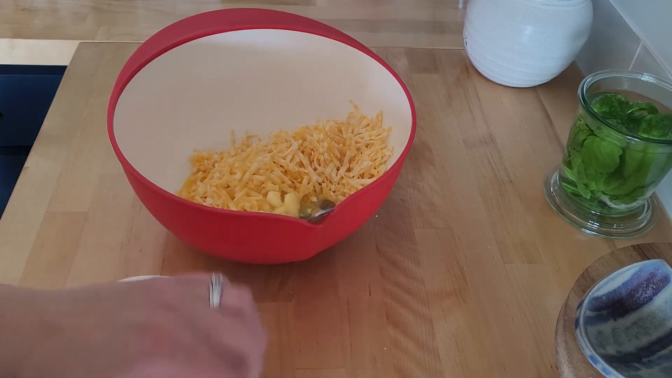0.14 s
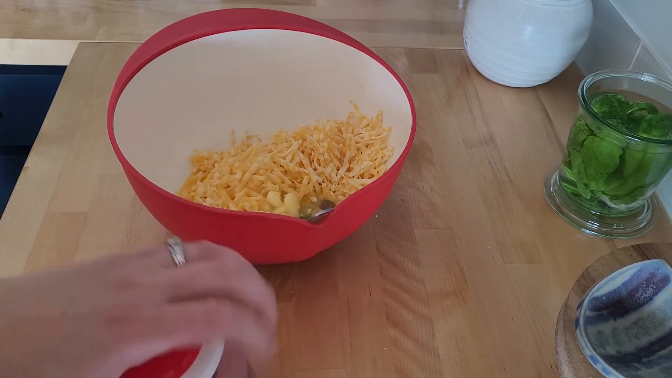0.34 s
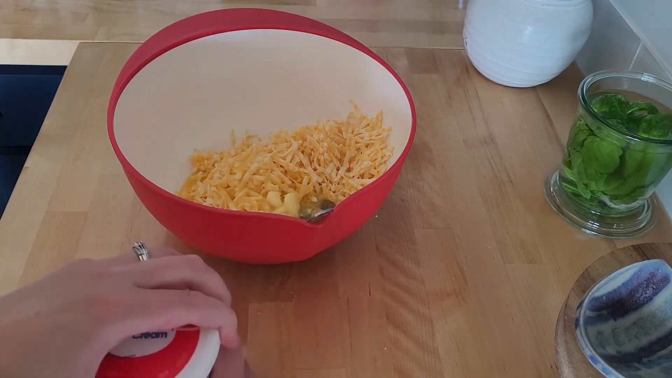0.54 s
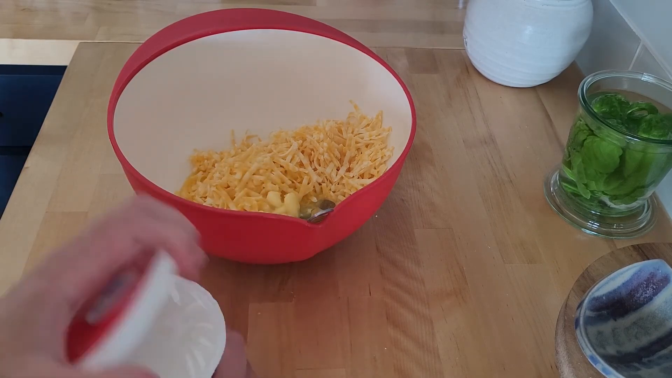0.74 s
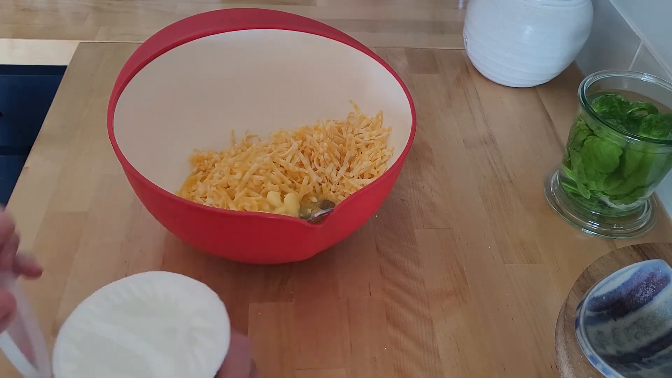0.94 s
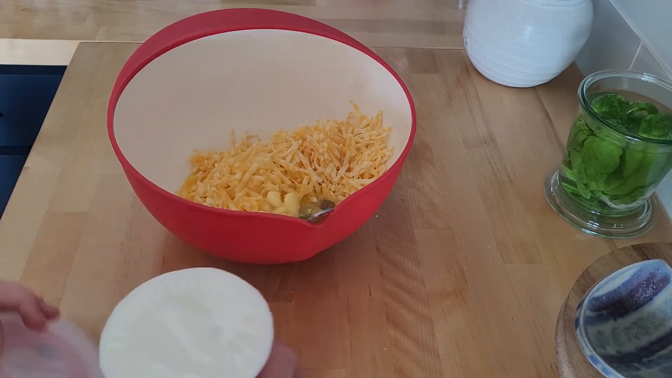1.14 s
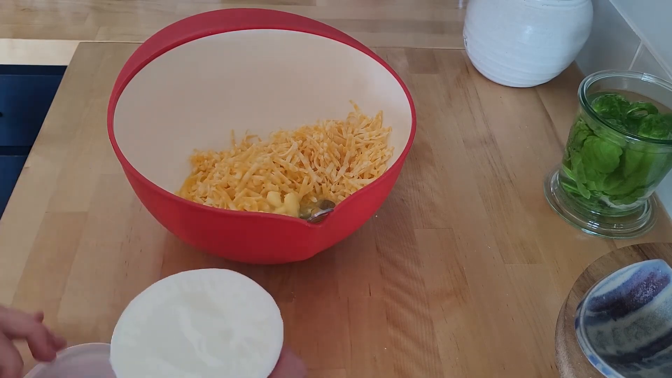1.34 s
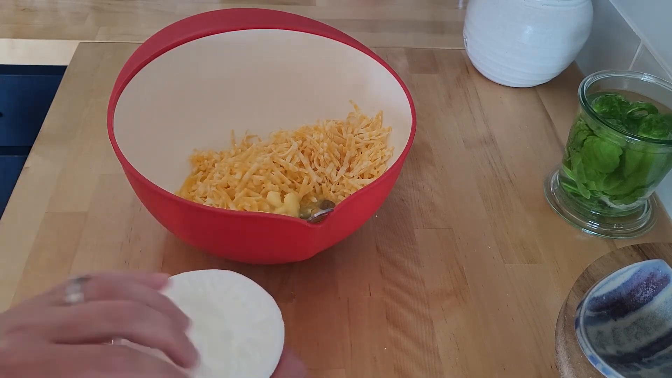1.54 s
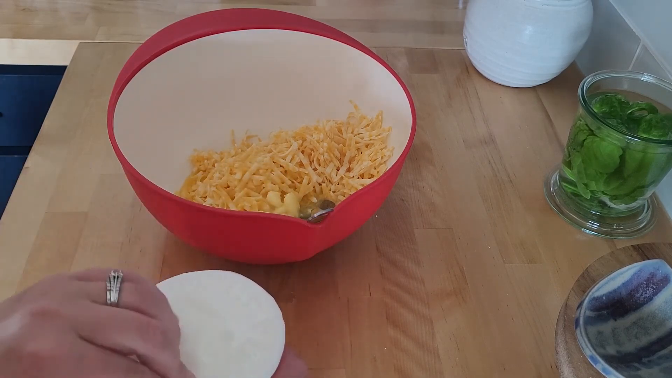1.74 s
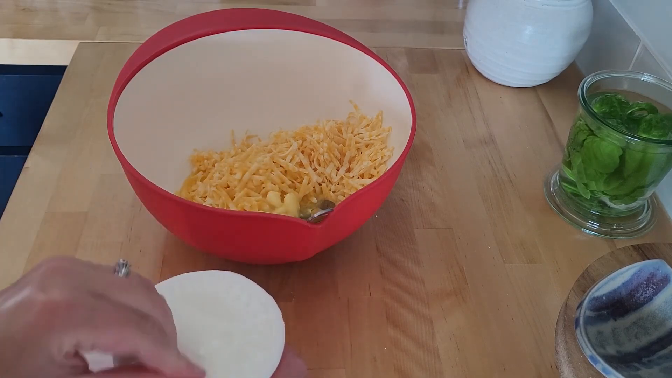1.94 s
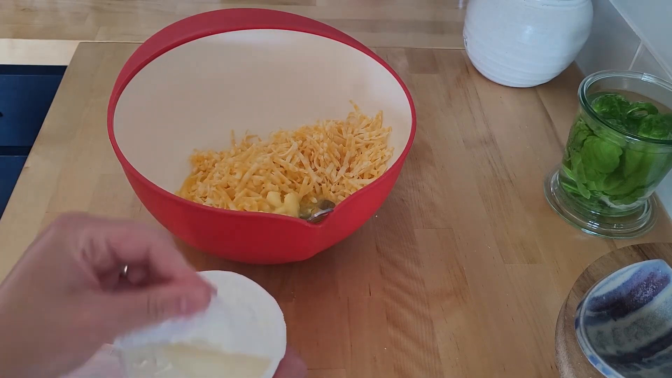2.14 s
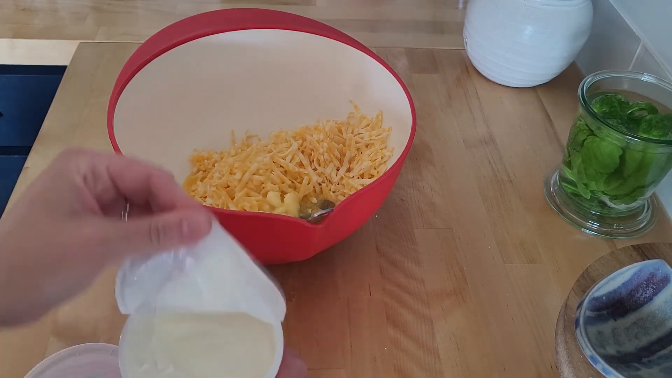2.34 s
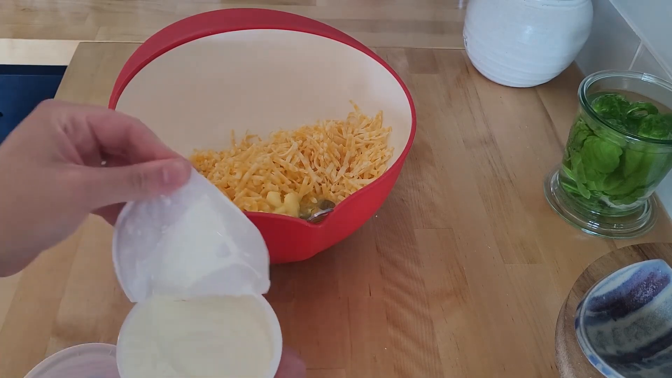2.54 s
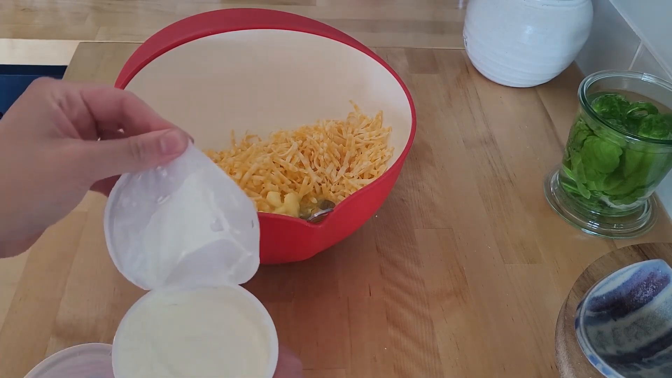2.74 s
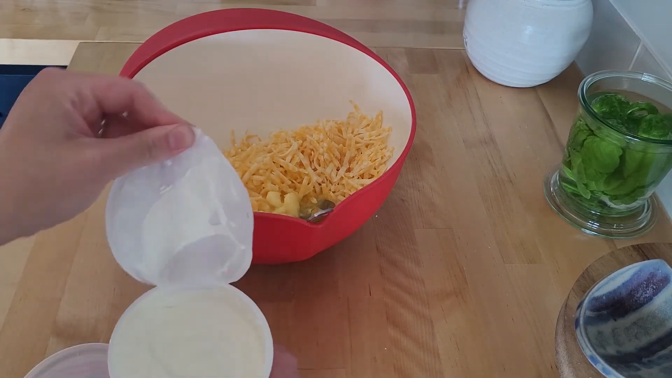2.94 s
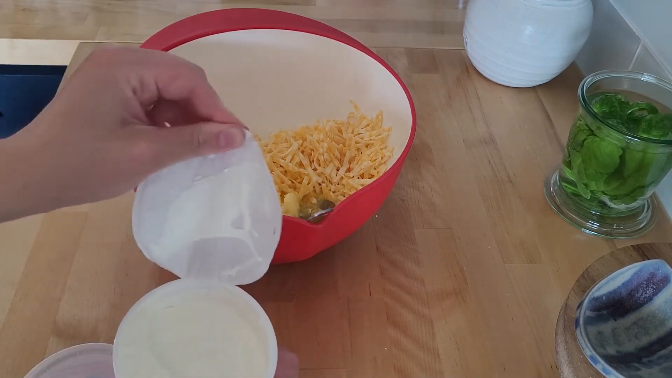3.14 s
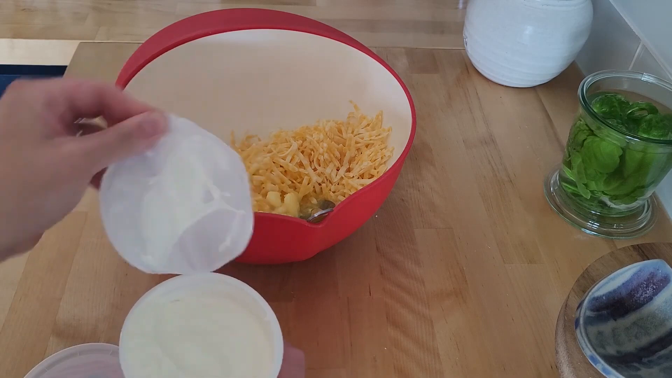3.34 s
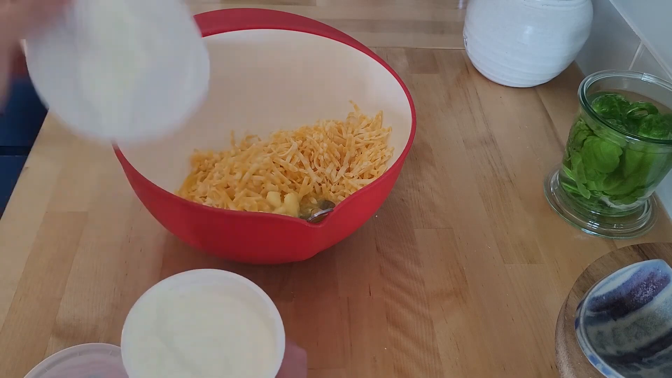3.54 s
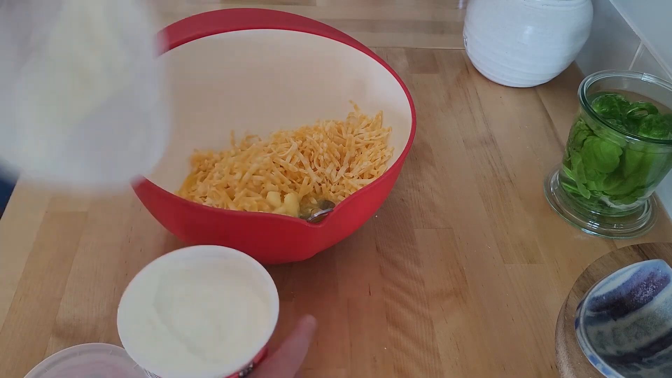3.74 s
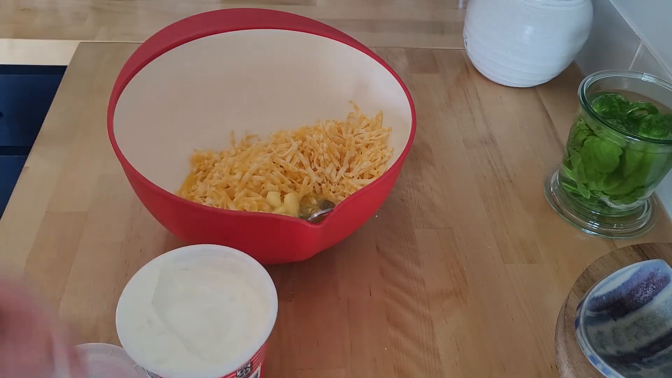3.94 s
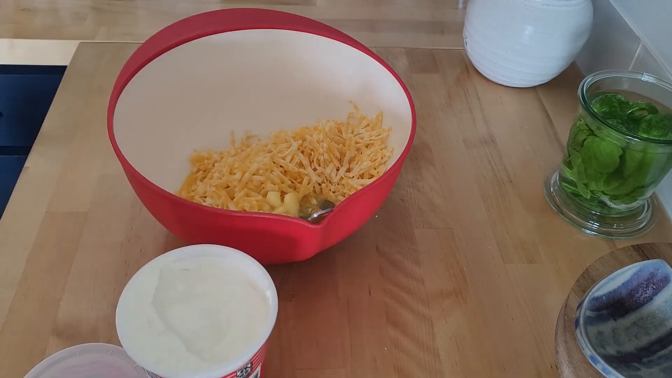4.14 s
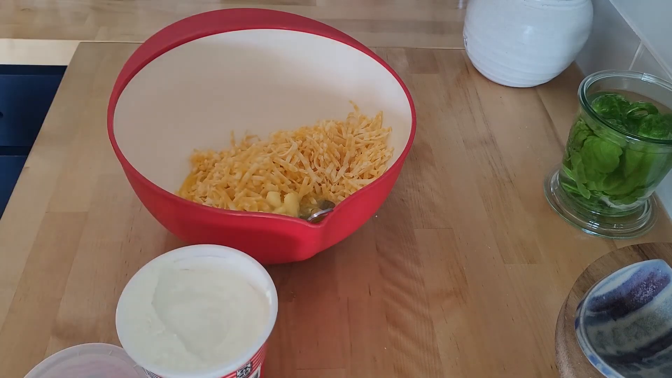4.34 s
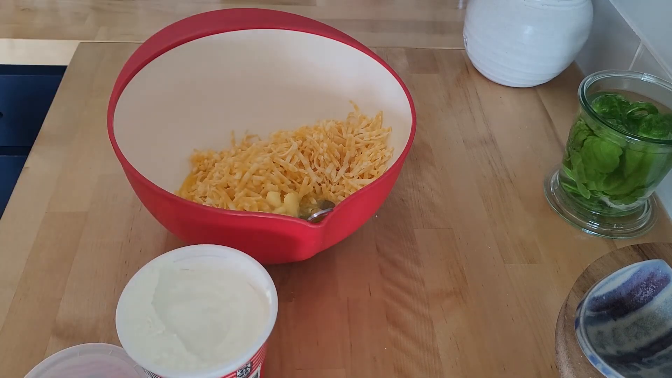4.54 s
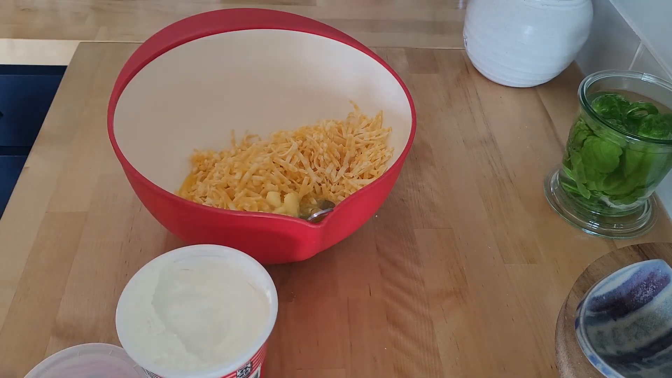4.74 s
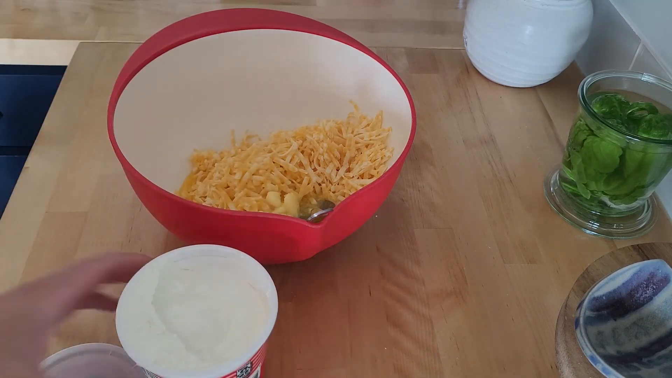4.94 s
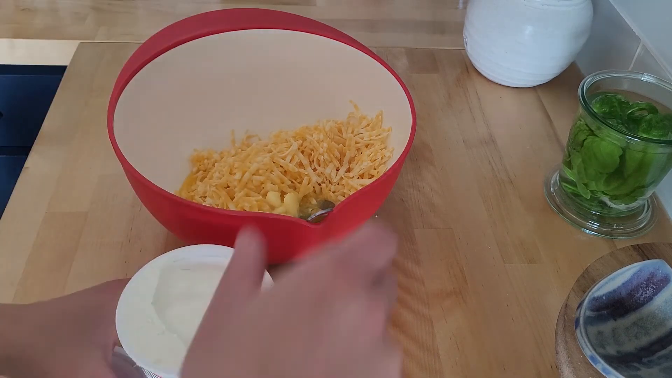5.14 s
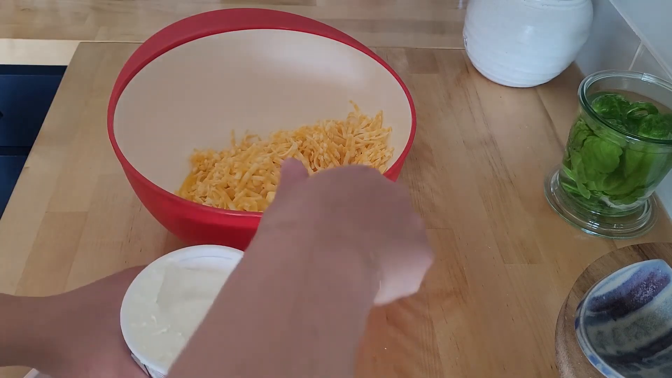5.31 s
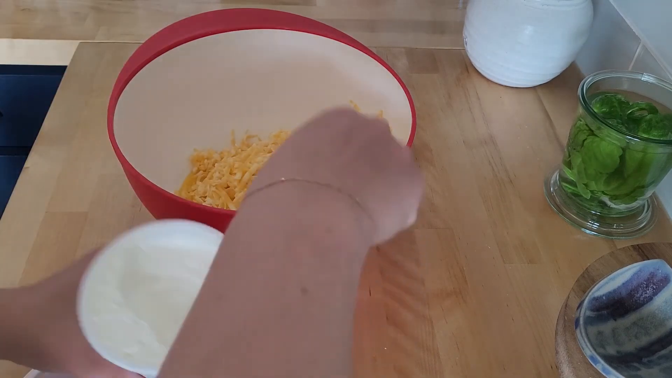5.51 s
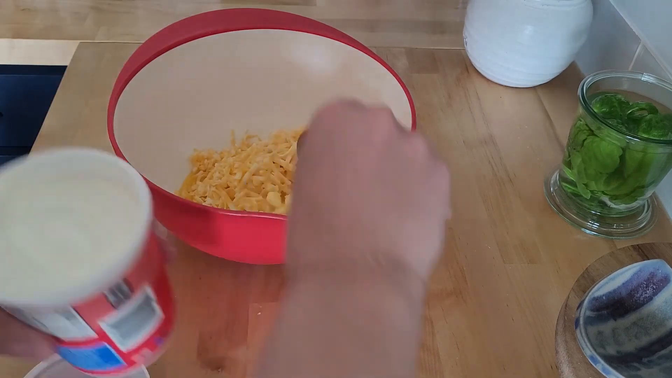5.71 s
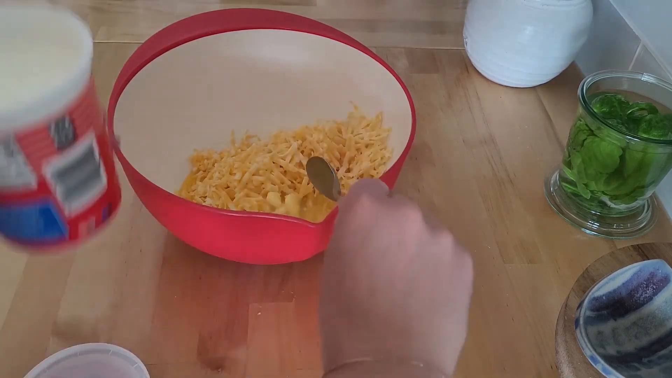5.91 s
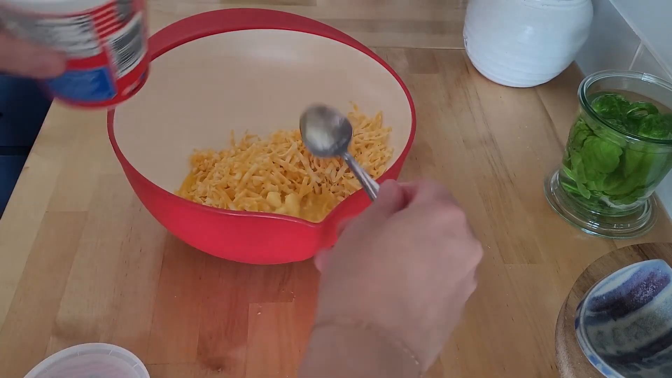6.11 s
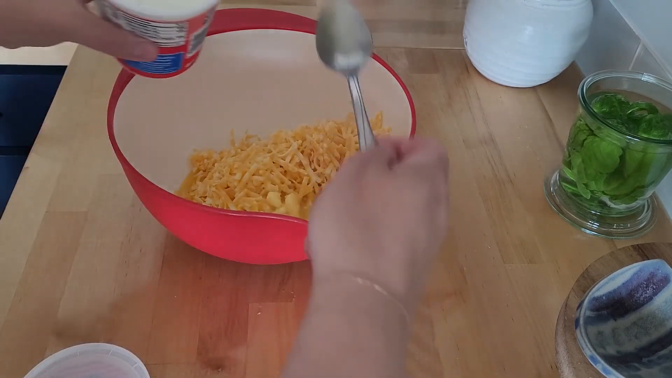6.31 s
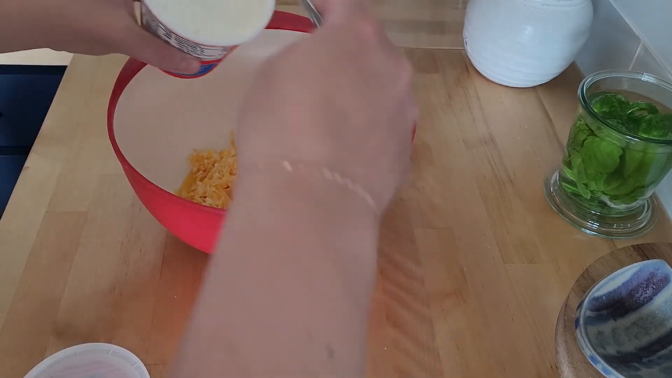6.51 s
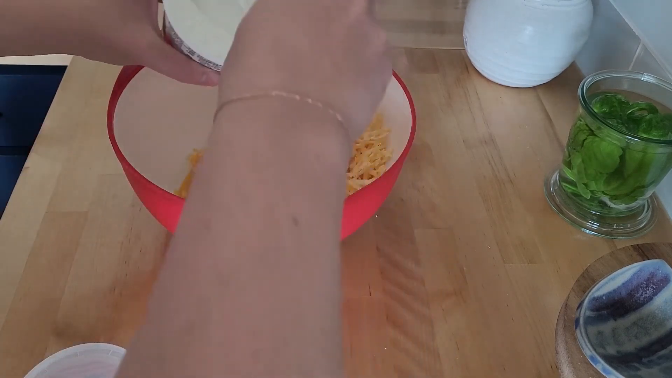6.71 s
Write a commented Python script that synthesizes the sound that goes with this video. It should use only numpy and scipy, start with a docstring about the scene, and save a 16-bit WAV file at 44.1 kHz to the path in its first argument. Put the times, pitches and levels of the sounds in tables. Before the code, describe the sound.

Sharp, close clicks come from a plastic lid being pried off a tub and dropped. Then a thin seal tears from the rim, crinkling for about two seconds. After a small metallic clink come a short rustling tap, the soft brush of a hand and a bouncing knock on a wooden counter. The kitchen adds a short reverberation and a faint, steady low hum.

```python
"""On a wooden kitchen counter, a plastic tub is opened close to a two-port microphone.
The lid snaps off and is dropped; the thin seal is peeled with crackles and put away. Both sound by
stick-slip friction: runs of tiny slips excite the resonances of the plastic. A hand brushes past,
something metallic clinks, and knocks ring the counter's modes. A small motor hums behind it all,
the room adds a short reverberation, and a faint hiss lingers at the end."""
import sys
import numpy as np
from scipy import signal
from scipy.io import wavfile

SR = 44100
rng = np.random.default_rng(int(sys.argv[2]) if len(sys.argv) > 2 else 0)


def bounce(signal):
    """Save signal as a 16-bit WAV file at the path given by the first command-line argument."""
    frames = np.transpose(np.atleast_2d(signal))
    limited = np.clip(frames, -1, 1)
    pcm = np.round(limited * 32767).astype(np.int16)
    wavfile.write(sys.argv[1], SR, pcm)


N = 298557
CRACK_ALIKE, BODY_ALIKE = 0.21, 0.54   # share of power common to both ports; the rest takes other paths
SEAL_WIDTHS = (.35, .26)   # crack and body bandwidths as shares of their pitch


def amp(db):
    """Amplitude ratio of a level in decibels."""
    return 10 ** (np.asarray(db) / 20)


def rms_one(x):
    """Normalisation to unit rms."""
    return x / np.sqrt(np.mean(x ** 2) + 1e-20)


def peak_one(x):
    """Normalisation to unit peak."""
    return x / np.max(np.abs(x))


def at_hz(points, hz):
    """Interpolation on a log-frequency axis."""
    pitches, values = np.transpose(points)
    return np.interp(np.log(hz), np.log(pitches), values)


def butterworth(x, order, hz, kind):
    """Filtering with a maximally flat passband."""
    return signal.sosfilt(signal.butter(order, hz, kind, fs=SR, output="sos"), x)


def drift(rate_hz):
    """Low-passed noise: a slow random fluctuation of unit rms."""
    r = np.exp(-2 * np.pi * rate_hz / SR)
    return rms_one(signal.lfilter([1], [1, -2 * r, r * r], rng.standard_normal(N + SR))[SR:])


def resonate(x, hz, width_hz):
    """A damped resonator with unit gain at its peak."""
    r = np.exp(-np.pi * width_hz / SR)
    poles = [1, -2 * r * np.cos(2 * np.pi * hz / SR), r * r]
    return signal.lfilter(np.array([1, 0, -1]) * (1 - r * r) / 2, poles, x)


def forced_modes(x, modes):
    """Forced response, at unit rms, of modes (pitch_hz, width_hz, level_db) of alternating sign."""
    return rms_one(sum((-1) ** k * amp(db) * resonate(x, hz, width_hz)
                       for k, (hz, width_hz, db) in enumerate(modes)))


def free_modes(modes, strength, size):
    """Free decay after a blow; strength gives each mode a level offset and a sign."""
    t = np.arange(size) / SR
    return sum(amp(db + 1.7 * offset - 60 * t / t60) * np.sign(sign) * np.sin(2 * np.pi * hz * t)
               for (hz, db, t60), offset, sign in zip(modes, *strength))


def burst(noise, decay_s, hard=0.29, lead_s=1e-5):
    """Stick-slip: a run of slips creeps in and dies away; hard weights a sharp first slip."""
    t = np.arange(noise.shape[-1]) / SR - lead_s
    late = np.maximum(t, 0)
    decay = np.exp(-late / max(decay_s, .0003)) + hard * np.exp(-late / .0003)
    return noise * np.where(t < 0, np.exp(2.6 * np.minimum(t, 0) / lead_s), decay)


def swells(peak_s, db, rise_s, hold_s, fall_db_per_s):
    """Exponential envelopes that rise 23 dB in rise_s, hold and fade; the strongest prevails."""
    late = np.arange(0, N, 16) / SR - np.c_[peak_s]
    before_db = 23 * np.maximum(-late, 0) / np.maximum(np.c_[rise_s], .001)
    after_db = fall_db_per_s * np.maximum(late - np.c_[hold_s], 0)
    return np.repeat(amp(np.max(np.c_[db] - before_db - after_db, axis=0)), 16)[:N]


def panned(x, pan_db):
    """A level difference of left over right."""
    return x * amp([[pan_db / 2], [-pan_db / 2]])


def alike_below(pair, hz):
    """Diffuse-field coherence: left and right agree in the bass and differ in the treble."""
    mid, side = pair[0], butterworth(pair[1], 1, hz, "high")
    return np.array([mid + side, mid - side])


def at_ports(noise, alike):
    """Partial coherence: both ports share the first of three noises; the right hears later and less."""
    lag = round(.00016 * SR)
    left, right = np.sqrt(alike) * noise[0] + np.sqrt(1 - alike) * noise[1:]
    return panned(np.array([left, np.pad(right, (lag, 0))[:len(right)]]), pan_db=2.0)


def ambience():
    """The kitchen's noise floor: half-octave bands that flicker by random amplitude modulation."""
    # spectrum of the quiet kitchen: pitch_hz, relative_density_db
    spectrum = [(25, -12), (50, -3.5), (100, -10), (165, -14.5), (230, -5), (320, -8), (420, -16),
                (700, -27.5), (1100, -44), (3500, -41.5), (6000, -33), (15000, -55.5)]
    edges_hz = 22 * 2 ** np.arange(0, 9.8, .5)
    white = rng.standard_normal((2, 2, N))
    flicker_db = [2 * drift(5), 2 * drift(9)]
    out = 0
    for k, (low, high) in enumerate(zip(edges_hz, edges_hz[1:])):
        band = butterworth(white[k % 2], 2, [low, high], "band")
        out = out + band * amp(at_hz(spectrum, np.sqrt(low * high)) + flicker_db[k % 2])
    return amp(-65.5) * rms_one(alike_below(out, hz=400))


def motor():
    """Periodic vibration of a small motor: one tone, wavering slightly in pitch and level."""
    pitch_hz = 132.5 + .5 * drift(2.2)
    phase = 2 * np.pi * np.cumsum(pitch_hz) / SR
    hum = np.sqrt(2) * amp(-57.5 + 2.1 * drift(10)) * np.sin(phase)
    return panned(hum, pan_db=-6.0)


def reverberation(x):
    """Diffuse reflections: convolution with octave bands of noise, each decaying at its own rate."""
    # reverberation time of the kitchen: pitch_hz, t60_s
    decay_times = [(60, 0.51), (400, 0.43), (1100, 0.45), (3000, 0.51), (8000, 0.35), (14000, 0.3)]
    t, tail = np.arange(SR) / SR, 0
    for low in 40 * 2. ** np.arange(9):
        band = butterworth(rng.standard_normal((2, SR)), 2, [low, min(2 * low, 20000)], "band")
        tail = tail + band * amp(-60 * t / at_hz(decay_times, np.sqrt(2) * low))
    tail = alike_below(tail * np.minimum(t / 0.0028, 1), hz=500)   # echoes build up
    tail /= np.sqrt(np.sum(tail ** 2) / 2)
    return amp(-12.5) * signal.fftconvolve(x[None], tail, axes=1)[:, :N]


def swish_and_hiss():
    """Incoherent noise at the ports: a hand brushes past, then faint steady background hiss at the end."""
    # hand brushing past, then background hiss in the last row: peak_s, level_db, rise_s, hold_s
    noise_swells = [(3.6, -68, 0.092, 0.017), (3.964, -63, 0.024, 0.14), (4.62, -72.5, .03, .12),
                    (5.24, -64, 0.36, 0.047), (5.56, -76, .1, .15), (6.25, -92.5, 0.21, 0.48)]
    white = rng.standard_normal((2, 2, N))
    bright = forced_modes(white[0], [(2370, 680, -21.0), (5560, 4000, 5), (14600, 1600, -5.5)])
    dull = amp(-3.5) * rms_one(resonate(white[1], 921, 3500))
    return swells(*np.transpose(noise_swells), fall_db_per_s=41) * (bright + dull)


def metal_clink():
    """Modal ringing: a scraping touch briefly excites thin metal."""
    # touches on the metal: start_s, peak_db
    touches = [(3.9568, -24.5), (4.057, -52)]
    # modes of the metal: pitch_hz, level_db, t60_s
    metal_modes = [(1754, -16.5, 0.2), (1838, -21.5, 0.13), (3560, -7, 0.11), (4500, -17, 0.08),
                   (5400, -9, .12), (6657, -9, 0.1), (6640, 8.5, 0.067), (7020, -3, 0.12),
                   (9430, -2.5, 0.094)]
    size = 8192
    out = np.zeros(N + size)
    noises = rng.standard_normal((len(touches), 1024))
    strengths = rng.standard_normal((len(touches), 2, len(metal_modes)))
    for (start_s, db), noise, strength in zip(touches, noises, strengths):
        ring = signal.fftconvolve(free_modes(metal_modes, strength, size), burst(noise, decay_s=.008))
        at = round(start_s * SR)
        out[at:at + size] += amp(db) * peak_one(ring[:size])
    return out[:N]


def counter_knocks():
    """Impact excitation: each contact rings the counter's modes unevenly and rattles briefly."""
    # knocks and their bounces: start_s, level_db, relative_crack_db, relative_tick_db
    contacts = [(5.8795, -14, -2, -9.5), (5.893, -12, -20, -26), (5.918, -15, -20.5, -30.5),
                (5.945, -19, -9, -44), (4.787, -32, -25, -41), (4.826, -41.5, -30, -41)]
    # modes of the wooden counter: pitch_hz, level_db, t60_s
    wood_modes = [(66, -3, 0.11), (92.2, -1, 0.092), (115, 1.5, 0.06), (199, -4, 0.12),
                  (229.5, -10.5, 0.25), (280, -9, 0.19), (307, 0, 0.023), (513, -12.5, 0.12),
                  (623, -2, 0.042), (846, -9, 0.076), (1104, -5.5, 0.038)]
    size = 8192
    out = np.zeros(N + size)
    noises = rng.standard_normal((len(contacts), size))
    strengths = rng.standard_normal((len(contacts), 2, len(wood_modes)))
    for (start_s, db, crack_db, tick_db), noise, strength in zip(contacts, noises, strengths):
        ring = peak_one(free_modes(wood_modes, strength, size))
        rattle = burst(noise, decay_s=0.017, hard=0.93)
        crack = peak_one(resonate(resonate(rattle, 880, 1100), 1234, 5700))
        tick = peak_one(resonate(rattle, 4900, 11400))
        at = round(start_s * SR)
        out[at:at + size] += amp(db) * (ring + amp(crack_db) * crack + amp(tick_db) * tick)
    return out[:N]


def counter_bumps():
    """Structure-borne sound: the tub and hands bump the counter, which rumbles in two bass bands."""
    # bumps on the counter: peak_s, level_db, hold_s
    bumps = [(.322, -50, 0.015), (.53, -54, 0.024), (.769, -42, 0.016), (1.138, -50, 0.037),
             (1.344, -44, 0.0038), (1.903, -56.5, 0.007), (2.174, -45, 0.09), (2.4, -46.5, 0.031),
             (2.53, -47.5, 0.092), (3.154, -49.5, 0.0067), (3.38, -50, 0.031), (3.511, -45.5, 0.017)]
    peak_s, db, hold_s = np.transpose(bumps)
    rise_s = np.full(len(bumps), 0.033)
    low = rms_one(butterworth(rng.standard_normal(N), 4, [58, 115], "band"))
    upper = rms_one(butterworth(rng.standard_normal(N), 4, [150, 430], "band"))
    return swells(peak_s, db, rise_s, hold_s, fall_db_per_s=168) * (low + amp(-5) * upper)


def plastic_crackle():
    """Stick-slip under the fingers: dense slips ring the sheet and wall modes near the bend's pitch."""
    # pulls until the plastic gives: give_s, level_db, rise_s, hold_s, bend_hz, relative_bend_db
    pulls = [(0.001, -42, 0.018, 0.03, 660, -14), (0.103, -53, .05, 0.069, 473, -9),
             (0.179, -38.5, .002, 0.045, 400, -13), (0.337, -50, 0.018, 0.024, 1560, -2.5),
             (.49, -66.5, .02, 0.039, 404, 1), (0.637, -34, 0.0011, 0.055, 440, -9.5),
             (0.77, -22, 0.077, 0.016, 500, -16.5), (0.808, -23.5, .05, 0.01, 1490, -11),
             (1.139, -48, 0.0018, .05, 600, 2), (1.22, -52, .05, .03, 1300, -3),
             (1.303, -52.5, .1, 0.052, 1680, 1.5), (1.355, -36, .002, 0.0016, 1860, -8.5),
             (1.719, -54, 0.082, 0.092, 910, -31.5), (1.909, -43, .002, 0.0055, 1490, -12),
             (2.003, -42, 0.0083, 0.032, 1270, -11.5), (2.095, -34.5, .001, 0.048, 1530, -24),
             (2.148, -31.5, .01, 0.026, 1370, -5.5), (2.179, -27, .001, 0.0088, 1440, -8.5),
             (2.396, -32, 0.18, 0.022, 1300, -7), (2.504, -25, .001, 0.0069, 1140, -9.5),
             (2.689, -33.5, 0.081, 0.0096, 1710, -6), (2.904, -46.5, 0.11, 0.0067, 1150, -9),
             (2.987, -40.5, 0.0071, 0.015, 1700, -10.5), (3.063, -31, 0.0011, 0.022, 1870, -7.5),
             (3.297, -66, .002, 0.0068, 1230, -4), (3.375, -50, 0.052, 0.011, 970, 1.5),
             (3.509, -30.5, 0.0018, 0.0018, 890, -15.5), (3.7, -68.5, .1, 0.17, 400, -6),
             (3.968, -57, 0.079, 0.13, 1250, -12), (4.191, -67, .05, 0.13, 443, -9.5)]
    # resonances of the thin sheet: pitch_hz, width_hz, level_db
    sheet_modes = [(3020, 3400, 1), (4360, 1100, 6.5), (6660, 1600, 0.5)]
    slips_per_s, spread_octaves, seal_from_s = 3500, 0.88, 2.3
    t = np.arange(N) / SR
    give_s, db, rise_s, hold_s, bend_hz, bend_db = np.transpose(pulls)
    effort = swells(give_s, db, rise_s, hold_s, fall_db_per_s=395)
    rustle = swells(give_s, db - 24.5, rise_s, hold_s, fall_db_per_s=122.5)
    pull = np.maximum(np.searchsorted(np.sort(give_s - rise_s / 2), t) - 1, 0)   # each bends its own spot
    shape = (2, 3, N)
    sizes = amp(3.5 * np.minimum(rng.exponential(1, shape), 4)) * rng.choice([-1, 1], shape)
    slips = sizes * (rng.random(shape) < slips_per_s / SR) * amp(3.5 * drift(60))
    sheet, wall = at_ports(slips[0], CRACK_ALIKE), at_ports(slips[1], BODY_ALIKE)
    bent = 0
    for hz in np.geomspace(260, 2400, 10):
        weight = np.exp(-(np.log2(hz / bend_hz[pull]) / spread_octaves) ** 2)
        bent = bent + weight * rms_one(resonate(wall, hz, 0.16 * hz))
    fizz_db = np.where(t < seal_from_s, -14, -10)   # the thin seal is brighter than the lid
    fizz = amp(fizz_db) * rms_one(resonate(sheet, 11000, 5400))
    return (effort + rustle) * (forced_modes(sheet, sheet_modes) + fizz + amp(bend_db[pull]) * bent)


def snaps(events, widths, burst_s, body_stretch, hard):
    """Transient excitation: slips drive a bright crack, a duller, longer body ring and a fizz."""
    size, lead_s = 4096, 0.0013
    crack_width, body_width = widths
    out = np.zeros((2, N + size))
    for start_s, db, crack_hz, body_hz, body_db, fizz_db in events:
        noise = rng.standard_normal((3, 3, size))
        decay_s = burst_s * 2 ** (-0.015 * (db + 14))   # louder snaps are shorter
        sharp = at_ports(burst(noise[0], decay_s, hard, lead_s), CRACK_ALIKE)
        dull = at_ports(burst(noise[1], body_stretch * decay_s, hard, lead_s), BODY_ALIKE)
        fine = at_ports(burst(noise[2], 0.91 * decay_s, hard, lead_s), CRACK_ALIKE)
        crack = peak_one(resonate(sharp, crack_hz, crack_width * crack_hz)
                         + .2 * resonate(sharp, 4000, 4000))
        ring = peak_one(resonate(dull, body_hz, body_width * body_hz) + .1 * resonate(dull, 900, 1500))
        fizz = peak_one(butterworth(fine, 2, 9000, "high"))
        at = round(start_s * SR)
        out[:, at:at + size] += amp(db) * (crack + amp(body_db) * ring + amp(fizz_db) * fizz)
    return out[:, :N]


def scrape_and_seal_landing():
    """Drawn-out friction: the bright scrape of the metal clink, then the seal rustling and landing."""
    # scrape of the clink (first two rows), then the seal put away:
    # start_s, level_db, crack_hz, body_hz, relative_body_db, relative_fizz_db
    contacts = [(3.9561, -29, 6550, 1770, -43, 1), (4.055, -40, 6500, 1760, -6, 7),
                (4.2014, -47.5, 4100, 970, -3.5, -3), (4.2788, -49, 2120, 2110, -21, -21),
                (4.362, -52.5, 3020, 1820, 2.5, -10.5), (4.3835, -48, 5150, 1770, -8.5, -13),
                (4.6185, -46, 5870, 611, -34, -24), (4.7723, -27, 5400, 2000, -1, -15),
                (4.783, -14.5, 2300, 900, -16.5, -25), (4.7995, -21, 2000, 2230, -28, -24)]
    return snaps(contacts, SEAL_WIDTHS, burst_s=0.015, body_stretch=1.86, hard=0)


def seal_peeling():
    """Stick-slip peeling: the seal tears from the rim and crumples, ringing its broad resonances."""
    # tears and creases: start_s, level_db, crack_hz, body_hz, relative_body_db, relative_fizz_db
    tears = [(1.697, -27.5, 5700, 2020, -23, -3.5), (1.731, -23.5, 4870, 2020, -14, -1),
             (1.7766, -27.5, 2780, 2130, -10.5, -12), (1.7848, -19.5, 5050, 536, -15.5, -1.5),
             (1.882, -43, 3900, 980, -4.5, -19.5), (1.9009, -18, 5450, 1440, -35, -10.5),
             (1.9314, -52, 2500, 2060, 1.5, -20), (1.9832, -31.5, 4750, 1400, 11.5, -17.5),
             (1.9933, -10, 6560, 552, -18, 0.5), (2.0253, -15.5, 6170, 1330, -11, -0.5),
             (2.0967, -17, 6200, 2040, -1.5, 11.5), (2.112, -19.5, 5920, 1880, -34.5, -13.5),
             (2.1274, -28.5, 5640, 1400, -3, -17), (2.1525, -12.5, 2580, 1350, 0.5, 6),
             (2.1779, -8, 4740, 1460, -29, 3.5), (2.201, -39, 3390, 1260, -17.5, -19),
             (2.232, -20, 3130, 1430, -5.5, -16.5), (2.3176, -27.5, 4910, 1400, -11.5, -19),
             (2.3341, -9.5, 3200, 1450, -7, -19.5), (2.358, -17.5, 2530, 1410, -11.5, -7),
             (2.371, -12.5, 2460, 2170, -16.5, -15), (2.4024, -7.5, 4960, 2170, -18.5, -27),
             (2.417, -24.5, 4140, 1470, -24.5, -25), (2.4362, -15.5, 2470, 388, -7, -15),
             (2.471, -16.5, 5570, 1500, -9, -5.5), (2.4984, -11.5, 6400, 1240, -2, 9),
             (2.5336, -12.5, 5530, 872, -4, -18.5), (2.5683, -23, 3540, 856, -28, 1),
             (2.5873, -16.5, 4550, 2030, 0, -26), (2.647, -15.5, 6340, 2000, -22, -0.5),
             (2.661, -24, 2415, 853, -2.5, -6), (2.6872, -10.5, 5470, 2010, -3.5, -0.5),
             (2.6985, -14.5, 4660, 1870, -33, -10), (2.7092, -15, 3520, 1810, -0.5, -15.5),
             (2.7172, -18, 3160, 1830, 12, -22.5), (2.798, -21.5, 3640, 1830, -1.5, -24.5),
             (2.834, -19, 4700, 708, -13, 0), (2.8889, -23, 3100, 1250, -2.5, -9),
             (2.9814, -22, 5760, 2200, -12, -27), (2.9883, -21.5, 5720, 870, -17.5, 8.5),
             (3.0007, -24, 3260, 1830, -5, -9), (3.027, -21.5, 4550, 1210, -21, 4),
             (3.0581, -10, 3270, 1840, -3, -20), (3.0784, -27, 2510, 869, -5.5, -16),
             (3.095, -27, 2590, 2060, -25, -4), (3.145, -25, 3110, 1850, -12, -20),
             (3.161, -21.5, 5100, 1820, -5, -23), (3.2924, -25, 2380, 888, -4, -41),
             (3.3312, -39, 2480, 1860, 17, -37), (3.3467, -25, 3160, 705, -1, -28),
             (3.3717, -27.5, 5530, 506, -4.5, -17), (3.4082, -26.5, 2490, 861, -14, -21),
             (3.4214, -24.5, 6110, 700, -19, -11), (3.5109, -14.5, 2200, 886, -12, 5.5),
             (3.7675, -37.5, 5180, 385, -14.5, -18), (3.8235, -30.5, 3490, 355, -22, -27)]
    return snaps(tears, SEAL_WIDTHS, burst_s=0.004, body_stretch=2.2, hard=2.0)


def lid_snapping():
    """Elastic release and impact: the lid rings as it flexes, pops off and drops."""
    # snaps of the lid: start_s, level_db, crack_hz, body_hz, relative_body_db, relative_fizz_db
    lid_snaps = [(0.1588, -38.5, 3920, 413, -9.5, -17), (0.1847, -14, 3810, 404, -6, -17),
                 (0.2414, -24.5, 6715, 533, -45.5, -15), (0.2476, -11, 6860, 480.4, -42, -1),
                 (0.3229, -31, 4010, 1840, 4.5, -21.5), (0.353, -41.5, 5470, 1890, 0.5, -7.5),
                 (0.405, -39.5, 3560, 1800, 0.5, -29), (0.4822, -42.5, 3870, 392, 3.5, -21.5),
                 (0.526, -54, 3320, 396, -5.5, -8), (0.5771, -9.5, 4570, 535.4, -37, -12.5),
                 (0.5858, -5.5, 4020, 1822, -32.5, -5), (0.6289, -8, 3906, 459, -26, -26.5),
                 (0.643, -14, 5480, 479, -24.5, -20.5), (0.6978, -15.5, 6550, 1436, -2, -15),
                 (0.7205, -21, 4300, 1390, -1.5, 4), (0.7567, -8, 4050, 444, -10, -3.5),
                 (0.7796, -12, 6210, 1430, -25.5, -18.5), (0.7972, -11.5, 4540, 1310, -20, -21.5),
                 (0.813, -11, 4550, 1318, -27, -25.5), (0.843, -24, 5940, 2116, -26.5, -6.5),
                 (0.8616, -16, 4940, 1340, -18.5, -15), (1.136, -23, 2430, 838, 2.5, -4.5),
                 (1.3421, -3, 3880, 1870, -23, -19), (1.354, -56.5, 4820, 1760, -3.5, -25),
                 (1.3641, -6, 4260, 2200, -24.5, -23)]
    return snaps(lid_snaps, widths=(.24, .22), burst_s=0.0057, body_stretch=2.3, hard=2.5)


def scene():
    """Superposition of direct sound, vibration through the stand, reverberation and background."""
    crackle, rumble = plastic_crackle(), counter_bumps()
    near = lid_snapping() + seal_peeling() + crackle
    away = scrape_and_seal_landing()
    far = butterworth(counter_knocks() + metal_clink(), 3, 55, "high")   # the stand passes no deep bass
    room = reverberation(near[0] + amp(7) * far + amp(-1) * away[0])
    direct = near + away + panned(far + rumble, pan_db=-2.4)
    return direct + room + swish_and_hiss() + motor() + ambience()


def record(dry):
    """Frequency response: the microphone housing dips near 8 kHz and peaks just below a steep cutoff."""
    dipped = dry - 0.73 * resonate(dry, hz=8230, width_hz=4500)
    peaked = dipped + 0.24 * resonate(dipped, hz=16000, width_hz=9600)
    return signal.sosfilt(signal.cheby2(20, 60, 16450, fs=SR, output="sos"), peaked)


dry = scene()
out = record(dry)
bounce(out)
```